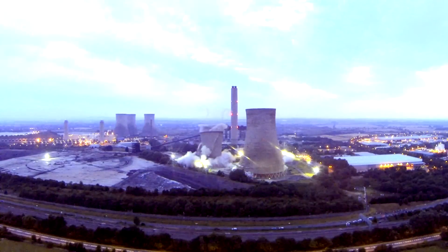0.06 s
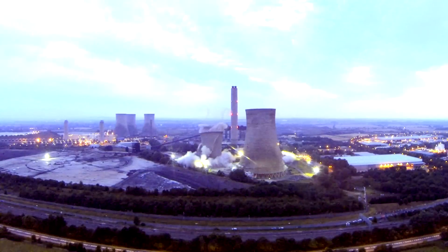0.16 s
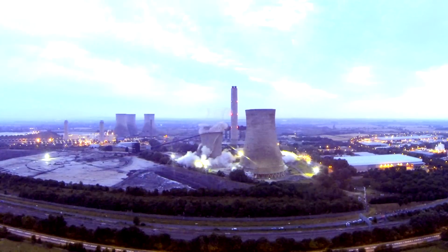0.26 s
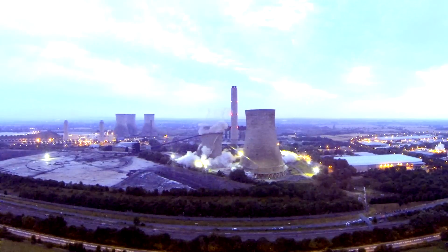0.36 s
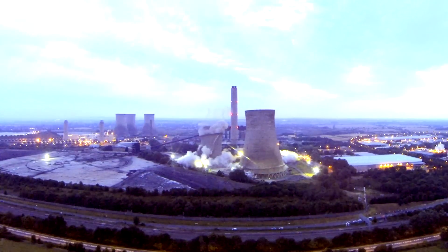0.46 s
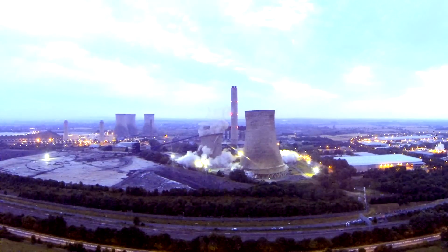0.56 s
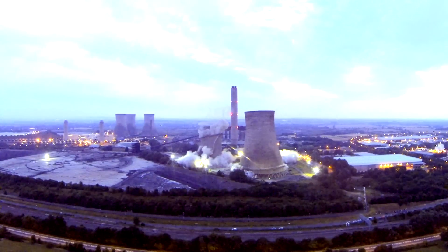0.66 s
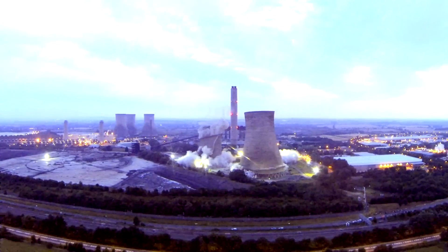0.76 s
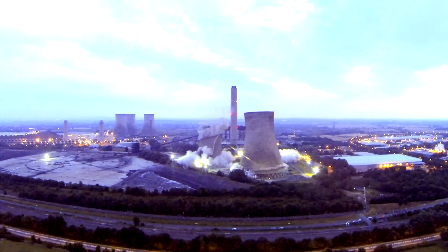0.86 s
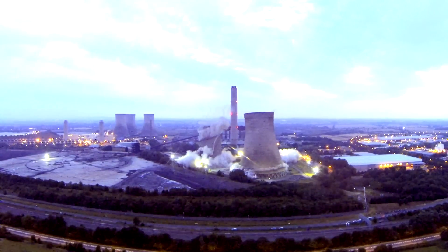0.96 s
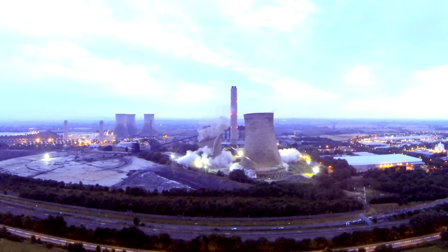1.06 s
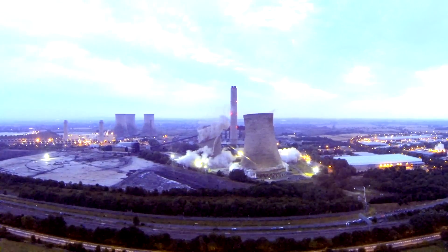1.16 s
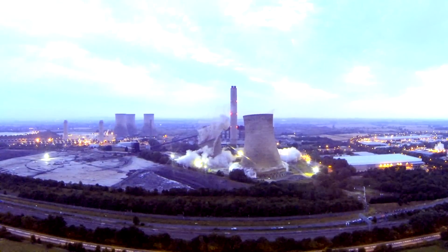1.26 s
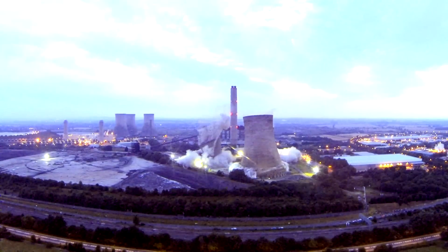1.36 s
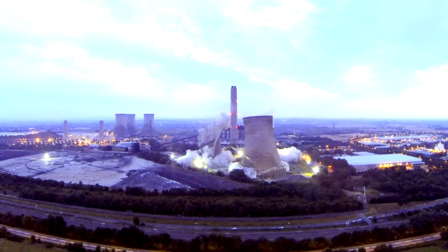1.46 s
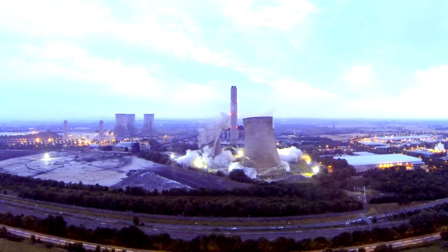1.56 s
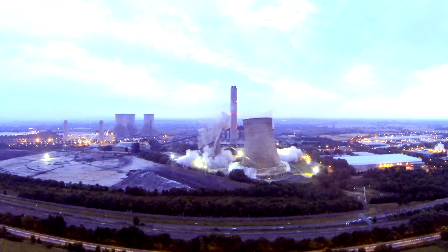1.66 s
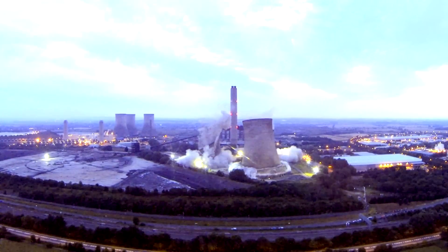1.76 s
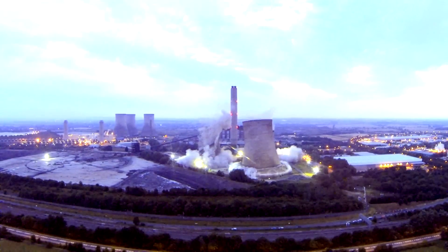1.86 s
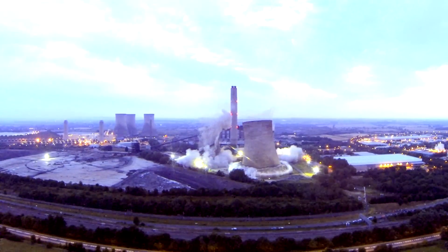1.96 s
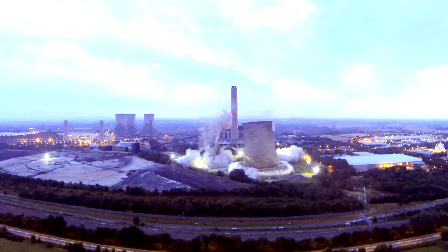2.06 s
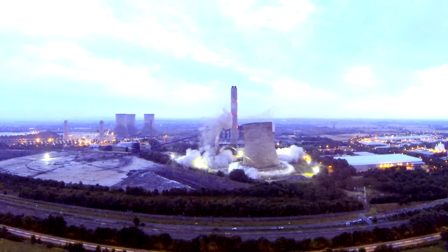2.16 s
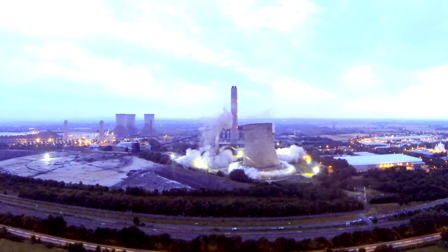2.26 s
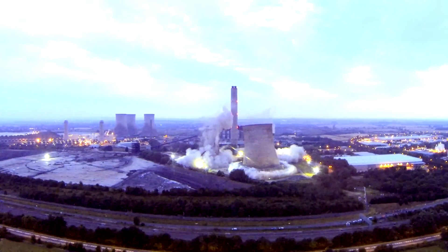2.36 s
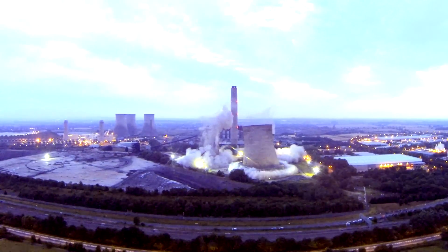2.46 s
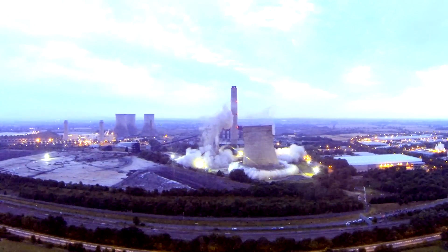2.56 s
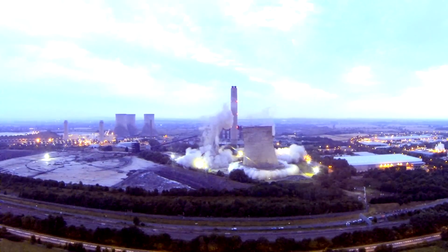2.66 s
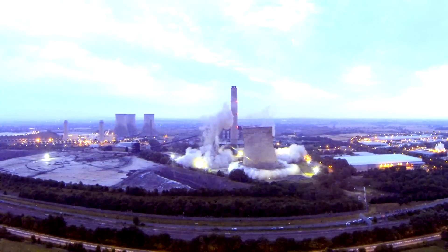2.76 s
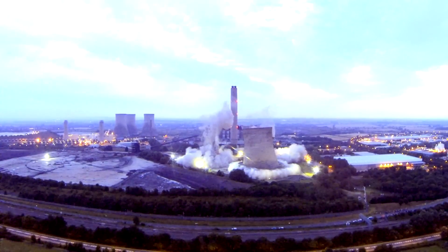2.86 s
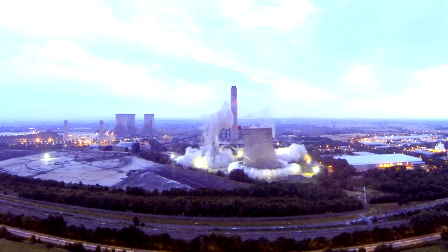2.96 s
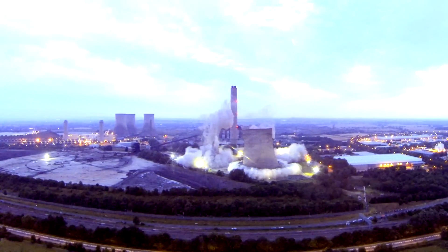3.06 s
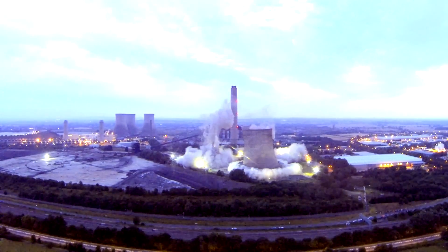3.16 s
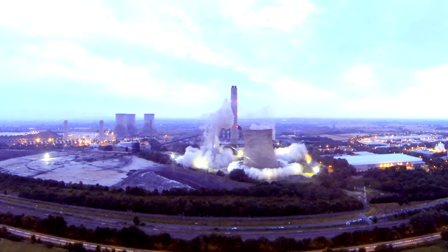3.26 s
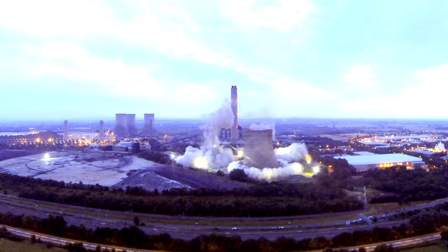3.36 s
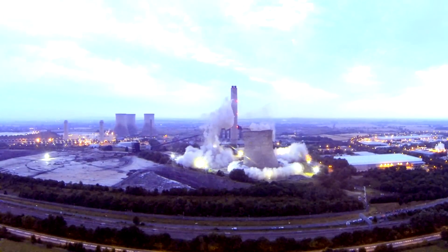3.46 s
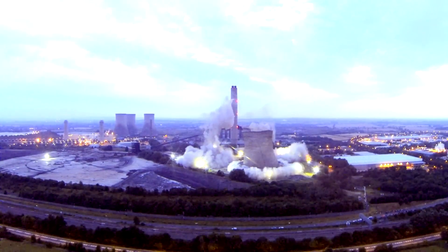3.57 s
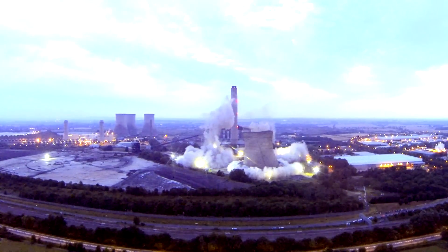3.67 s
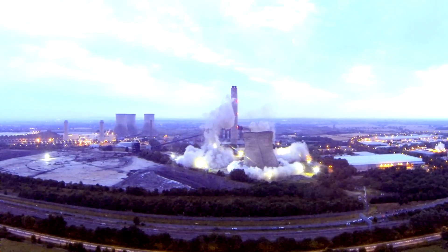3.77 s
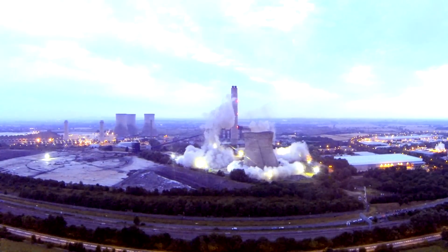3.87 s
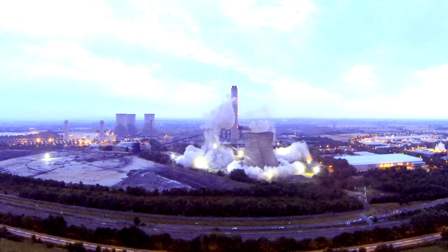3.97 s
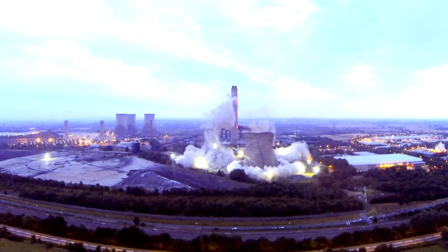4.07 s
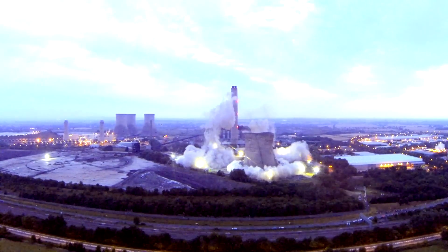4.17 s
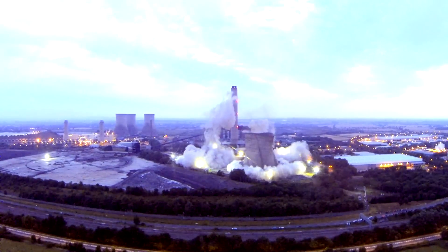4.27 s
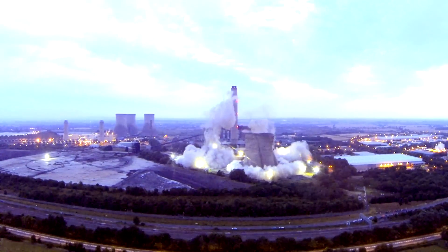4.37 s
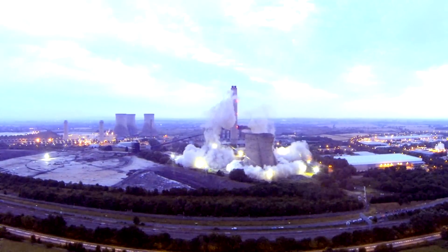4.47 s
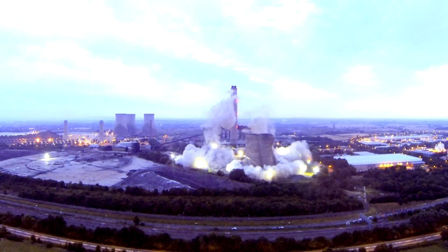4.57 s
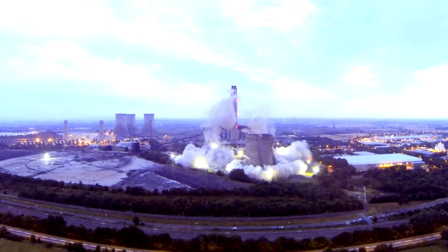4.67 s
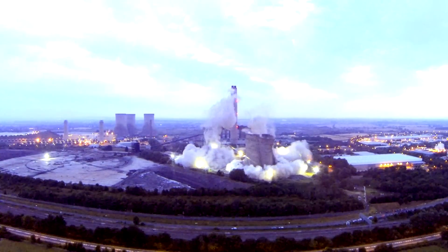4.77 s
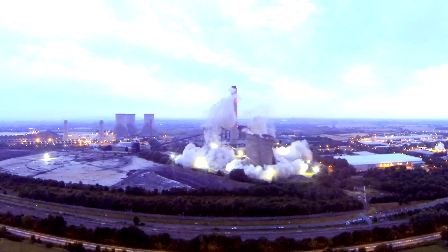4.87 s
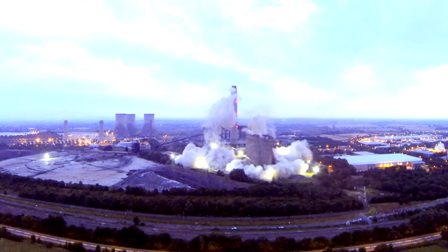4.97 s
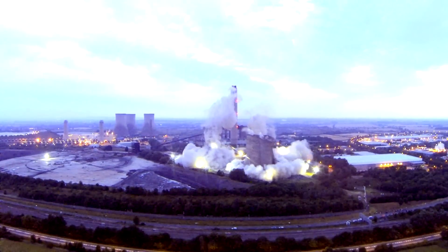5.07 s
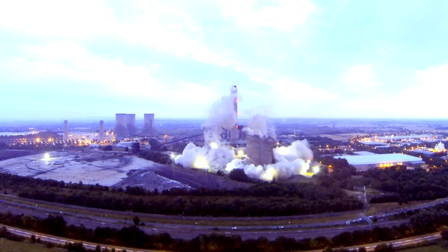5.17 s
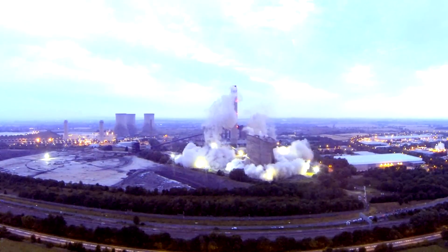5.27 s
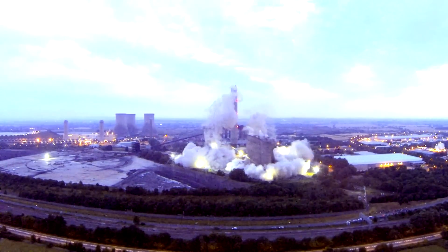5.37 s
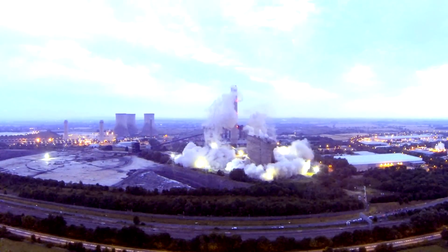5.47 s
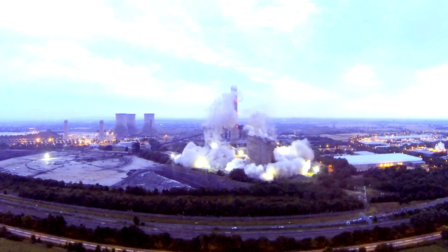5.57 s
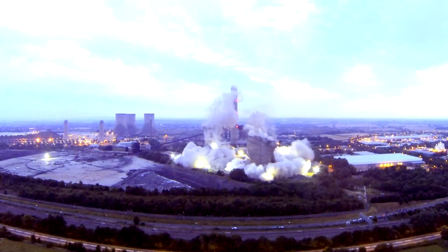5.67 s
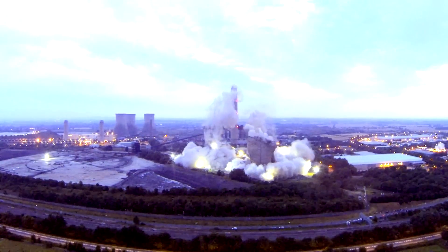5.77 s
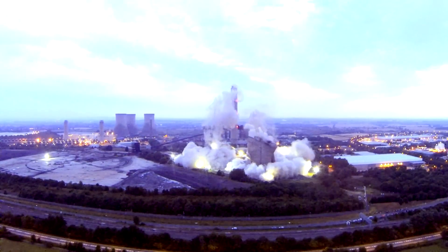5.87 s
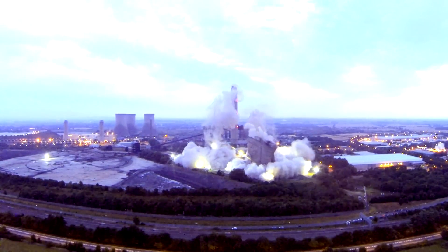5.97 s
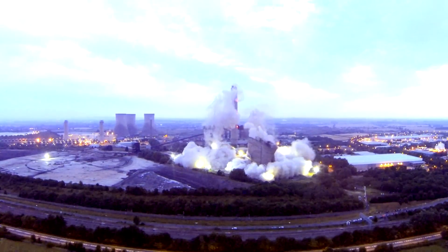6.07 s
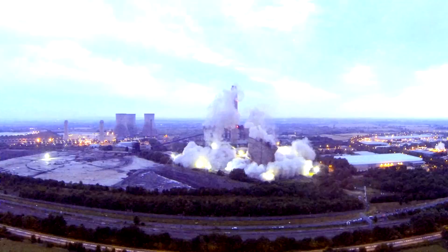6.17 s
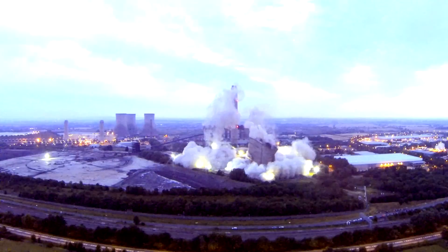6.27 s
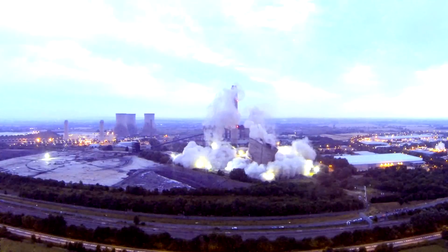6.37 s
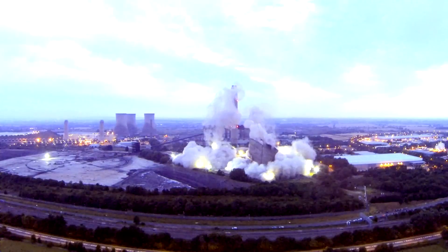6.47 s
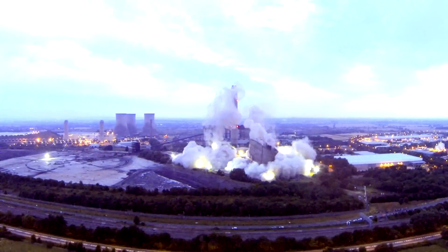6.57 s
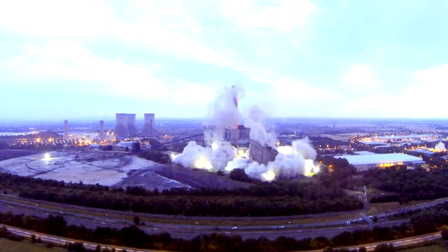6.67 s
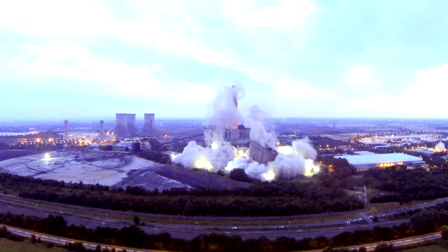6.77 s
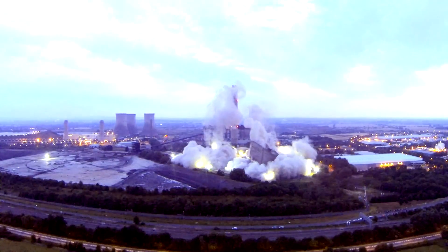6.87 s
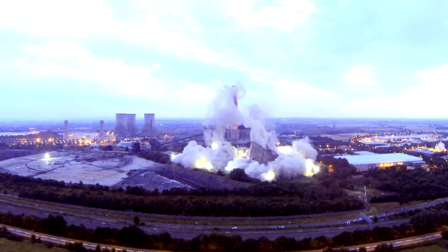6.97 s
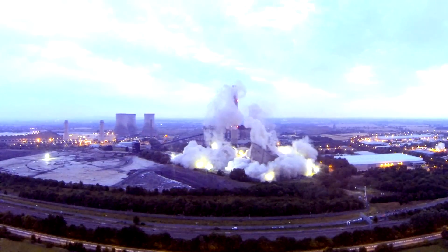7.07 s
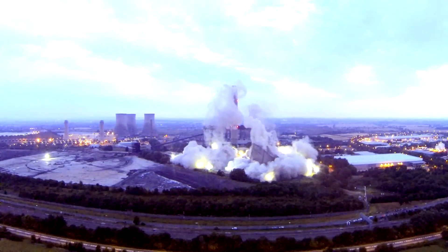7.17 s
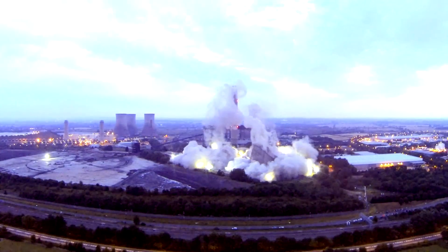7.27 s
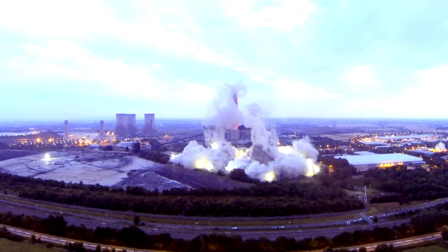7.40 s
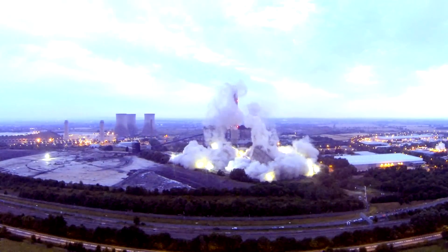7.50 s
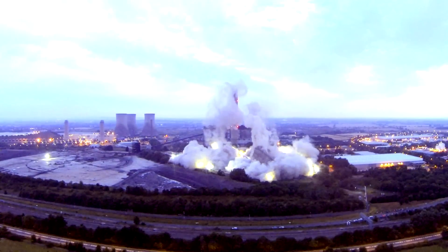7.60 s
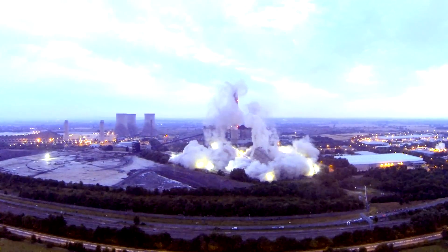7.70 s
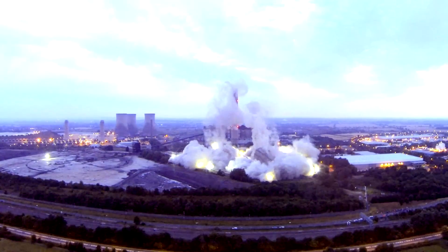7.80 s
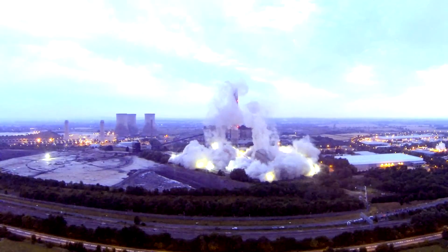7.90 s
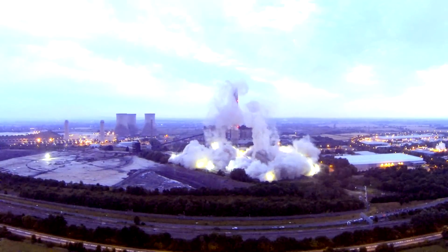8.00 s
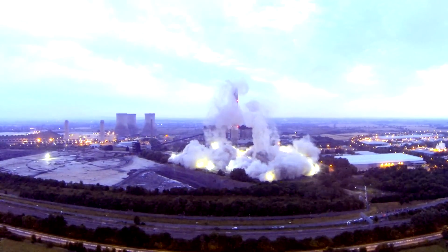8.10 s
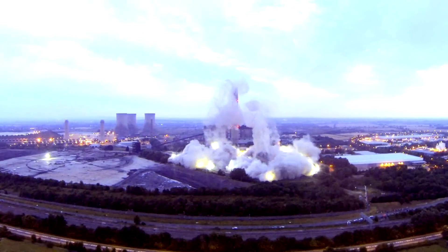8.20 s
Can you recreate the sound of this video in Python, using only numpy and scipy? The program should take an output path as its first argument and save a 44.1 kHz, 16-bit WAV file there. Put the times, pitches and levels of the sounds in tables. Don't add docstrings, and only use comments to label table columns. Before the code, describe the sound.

Heavy far-off explosions thud in overlapping echoes, concrete crashes down in a long fading rumble, with small ticks, faint hiss and a high whine.

```python
import sys
import numpy as np
from scipy import signal
from scipy.fft import rfft, irfft
from scipy.io import wavfile
from scipy.ndimage import uniform_filter1d

SR = 44100
rng = np.random.default_rng(int(sys.argv[2]) if len(sys.argv) > 2 else 0)


def wav_out(sig):
    wavfile.write(sys.argv[1], SR, np.round(np.clip(np.atleast_2d(sig).T, -1, 1) * 32767).astype(np.int16))


def field_ratio(decibels):
    return 10 ** (np.asarray(decibels, dtype=float) / 20)


N = 363384


def evened(x):
    return x / np.sqrt(np.mean(x ** 2) + 1e-20)


def add(mix, s, sound):
    part = mix[max(round(s * SR), 0):][:len(sound)]
    part += sound[:len(part)]


def curve(rows, column):
    rows = np.array(rows)
    return np.interp(np.arange(N) / SR, rows[:, 0], rows[:, column])


def coloured(x, points):
    f, db = np.transpose(points)
    hz = np.fft.rfftfreq(N, 1 / SR)
    gain = field_ratio(np.interp(np.log(hz + 1), np.log(f + 1), db))
    return evened(irfft(rfft(x) * gain, N))


def steadied(x, share, span_s):
    span = round(span_s * SR)
    power = uniform_filter1d(uniform_filter1d(x ** 2, span), span)
    return evened(x / (abs(power) + 1e-4) ** (share / 2))


def ring(hz, t60, rise_s=0.00095):
    t = np.arange(SR // 10) / SR
    return np.sin(2 * np.pi * hz * t) * field_ratio(-60 * t / t60) * (1 - np.exp(-t / rise_s))


def burst(lo_hz, hi_hz, t60):
    t = np.arange(SR // 10) / SR
    band = signal.butter(2, (lo_hz, hi_hz), "bandpass", fs=SR, output="sos")
    noise = evened(signal.sosfilt(band, rng.standard_normal(len(t))))
    return noise * field_ratio(-60 * t / t60) * (1 - np.exp(-t / 0.00078))


def hush(times, before_s, after_s, depth):
    out = np.zeros(N)
    for s in times:
        add(out, s - before_s, np.hanning(round((before_s + after_s) * SR)))
    return 1 - np.clip(depth, 0, 1) * np.minimum(out, 1)


def opening_ring():
    t = np.arange(SR // 10) / SR
    hz, level_db, t60 = 1270, -30, .03
    out = np.zeros(N)
    add(out, 0, field_ratio(level_db - 60 * t / t60) * np.cos(2 * np.pi * hz * t))
    return out


def dying(start_db, db_per_s, rest_db):
    return np.hypot(field_ratio(start_db + db_per_s * np.arange(N) / SR), field_ratio(rest_db))


# (time [s], roll level [dB], boom level [dB], thud level [dB])
ECHOES = [(0.0, 10.5, 8.5, -1.5), (.045, -8, -8, 11), (.075, 2, -16, -2), (.18, -13, 6, -1.5),
          (.34, 3, 8, 13.5), (.41, 1, 7, -2), (.55, 4, 4, -2), (.71, 7, -6, 9), (.78, 4, 0, 2),
          (.86, -5, 6, -2.5), (.94, 7, -2, -2.5), (1.01, -12, 8, -1), (1.17, 6.5, 3, -1), (1.22, -4, 1, 0),
          (1.265, 9, 1, 4.5), (1.33, -8, -8, 1.5), (1.42, -15, 2, 1), (1.54, -3, 11, -6), (1.7, 6, 10, 7),
          (1.81, 12, 18, 13.5), (1.97, 3, 4, 1.5), (2.04, -12, 10, -1.5), (2.66, -3, 4.5, 7.5),
          (2.87, 4, 4, -1.5), (2.95, 4, 2, 5.5), (3.21, 4.5, 1, -1), (3.99, 5, -1, 5), (5.33, -13, -5, -1),
          (6.82, 3, 4, .3), (7.1, 6, 10.5, -3)]


def echoes(column):
    t = np.arange(0, N + 64, 64) / SR
    db = np.zeros(len(t))
    for row in ECHOES:
        half_s = 0.018 + 0.007 * row[0]
        db += row[column] * np.exp(-((t - row[0]) / half_s) ** 2)
    return field_ratio(np.interp(np.arange(N) / SR, t, db))


# (frequency [Hz], level [dB per Hz])
ROLL = [(3, -30), (8, -10), (14, -4), (20, -1), (28, 0), (38, -4), (50, -14), (80, -40), (300, -120)]
BOOM = [(10, -92), (30, -40), (42, 4), (52, -4), (70, 0.5), (90, -5.5), (110, -14), (150, -47), (500, -120)]
THUD = [(20, -100), (70, -31), (105, 2), (130, 1), (170, -0.5), (220, -6), (300, -13), (420, -23),
        (600, -27.5), (900, -49), (2500, -110)]
# (time [s], debris roar level [dB])
FORCE = [(0, -35.5), (.04, -30), (.07, -35), (.14, -35.5), (.5, -39.5), (.87, -42), (1.42, -44),
         (1.56, -41.5), (1.65, -43), (1.93, -47.5), (2.03, -39.5), (2.14, -42), (2.3, -43), (2.6, -49.5),
         (3.3, -51), (3.55, -51), (6.1, -54.5), (8.24, -57.5)]


def rumble():
    a, b, c = rng.standard_normal((3, N))
    roll = steadied(coloured(a, ROLL), share=0.45, span_s=0.034)
    roll *= dying(start_db=-25, db_per_s=-5, rest_db=-58.5)
    boom = steadied(coloured(b, BOOM), share=1.0, span_s=0.054)
    boom *= dying(start_db=-33, db_per_s=-4, rest_db=-58)
    thud_db = curve(FORCE, column=1) + 1.4 - 10 * (np.arange(N) / N) ** 1.25
    thud = steadied(coloured(c, THUD), share=0.35, span_s=0.037) * field_ratio(thud_db)
    return roll * echoes(column=1) + boom * echoes(column=2) + thud * echoes(column=3)


# (frequency [Hz], width [Hz], level [dB])
HOUSING = [(413, 260, -14.5), (624, 40, -15.5), (982, 200, -10.5), (1170, 310, -9), (1270, 64, -1.5),
           (1330, 197, -3.5), (1674, 540, -14.5), (1910, 204, -14.5), (2563, 416, -21.5), (3034, 184, -22),
           (3384, 160, -27.5), (4050, 360, -51), (5650, 530, -76)]


def housing(x):
    hz = abs(np.fft.fftfreq(8192, 1 / SR))
    power = sum(field_ratio(2 * db) / (1 + (2 * (hz - f) / w) ** 2) ** 1.508 for f, w, db in HOUSING)
    power = power / (1 + (hz / 6500) ** 5.3)
    log_gain = np.log(power + 1e-11) / 2
    phase = -signal.hilbert(log_gain).imag
    taps = np.fft.ifft(np.exp(log_gain + 1j * phase)).real[:4096]
    return evened(signal.oaconvolve(x, taps)[:N])


LOUD_DB = -44
# (time [s], half length [s], tilt above the housing peak [dB per octave], body level [dB])
SHOWERS = [(1.983, 0.077, 2.5, -2), (3.65, .3, 3, 1.5), (4.38, .1, 2, 5.5), (5.0, 0.083, 1.3, 1.5),
           (5.5, .15, 2, .3), (6.2, 0.68, 3, 1.3), (7.952, 0.17, 0.8, 2)]


def roar():
    sizes = field_ratio(2.48 * np.minimum(rng.exponential(1, N), 6))
    struck = rng.random(N) < 2500 / SR
    impacts = sizes * struck * rng.choice([-1, 1], N)
    rung = housing(rng.standard_normal(N) + 0.52 * evened(impacts))
    hz, t, z = signal.stft(steadied(rung, share=0.72, span_s=0.1), SR, nperseg=512)
    tilt_db = -1.6 + 0.3235 * np.maximum(LOUD_DB - np.interp(t, *np.transpose(FORCE)), 0)
    body_db = -1.1 + 4.5 * np.exp(-((t - 2.25) / .7) ** 2)
    for s, half_s, shower_tilt_db, shower_body_db in SHOWERS:
        swell = np.exp(-((t - s) / half_s) ** 2)
        tilt_db += shower_tilt_db * swell
        body_db += shower_body_db * swell
    octaves = np.log2(np.maximum(hz, 1300) / 1300)[:, None]
    below = np.clip((1000 - hz) / 250, 0, 1)[:, None]
    z = z * field_ratio(np.minimum(octaves, 2.2) * tilt_db + below * body_db)
    return signal.istft(z, SR, nperseg=512)[1][:N] * field_ratio(curve(FORCE, column=1) + 0.5)


# (frequency [Hz], level [dB per Hz])
BUZZ_COLOUR = [(3500, -53), (4600, -26), (4850, 0), (5050, 2), (5350, -16), (6500, -48)]


def buzz():
    shaken = field_ratio(-76) * np.clip((.37 - np.arange(N) / SR) / .04, 0, 1)
    follows = field_ratio(-93.5 + .6 * (curve(FORCE, column=1) - LOUD_DB))
    level = np.sqrt(shaken ** 2 + follows ** 2 + field_ratio(2 * -84))
    return coloured(rng.standard_normal(N), BUZZ_COLOUR) * level


# (frequency [Hz], level [dB per Hz])
HISS = [(100, 6), (1000, 5), (4000, 4), (6000, 2), (8000, -1), (9750, -1.5), (10150, 2), (10700, -1),
        (13000, -2), (14200, -3), (15200, -5), (15600, -60)]
# (frequency [Hz], rms level [dB])
WHINE = [(6772, -100), (9830, -99), (10072, -102), (12075, -96), (13065, -100)]
# (multiple of the frame clock [1], rms level [dB])
SIDEBANDS = [(-10, -99), (-7, -101), (-6, -100), (-5, -103), (-3, -101), (-2, -96), (-1, -92), (0, -85),
             (1, -98), (2, -100), (3, -103)]


def circuit():
    t = np.arange(N) / SR
    whine_hz, clock_hz = 13906.1, 59.94
    tones = np.zeros(N)
    for hz, db in WHINE:
        tones += np.sqrt(2) * field_ratio(db) * np.sin(2 * np.pi * (hz * t + rng.random()))
    throb = np.zeros(N, complex)
    for k, db in SIDEBANDS:
        sign = 1 if k == 0 else -1
        throb += sign * field_ratio(db) * np.exp(2j * np.pi * k * clock_hz * (t - .0028))
    whine = np.sqrt(2) * (throb * np.exp(2j * np.pi * whine_hz * t)).real
    hiss = field_ratio(-72) * coloured(rng.standard_normal(N), HISS)
    return hiss + tones + whine


# (time [s], peak level [dB], pitch [Hz])
TICKS = [(0.0254, -58, 4140), (0.051, -55, 4110), (0.2238, -54, 4050), (0.2578, -50, 4200),
         (0.5094, -52, 4230), (0.8939, -57, 4930), (1.5893, -55, 4920), (1.7943, -56, 4930),
         (2.0018, -61, 5200), (2.2428, -67, 4690), (3.6014, -56, 4940), (4.6149, -54, 4800),
         (5.0379, -60, 4800), (5.3128, -77, 4820), (6.5735, -55, 4900), (6.7777, -55, 4750),
         (6.985, -57, 5640), (7.2708, -55, 4920)]
HIGH_TICKS = [(0.175, -58, 7410), (0.5127, -60.5, 6980), (0.8225, -61, 6800), (0.8505, -57, 7500),
              (1.1877, -56, 7100), (1.5259, -61, 7400), (1.8357, -63, 7310), (1.8637, -58, 7280),
              (2.173, -64, 7110), (2.193, -57, 7250), (4.9876, -56, 7210)]


def mount_ticks():
    out = np.zeros(N)
    for s, db, hz in TICKS:
        tick = .7 * ring(hz, 0.018) + .65 * burst(0.83 * hz, 1.75 * hz, 0.015)
        add(out, s, field_ratio(db - 1) * tick)
    for s, db, hz in HIGH_TICKS:
        tick = ring(hz, .02) + 0.68 * burst(.95 * hz, 1.5 * hz, 0.016)
        add(out, s, field_ratio(db - 5) * tick)
    return out


# (time [s], peak level [dB], cycle [s], signed strength: + push first, - suction first [1])
WAVES = [(0.026, -14, 0.032, -1.08), (0.091, -14.5, 0.02, -0.71), (.326, -19.5, 0.039, -1.14),
         (.451, -17, 0.0374, -0.95), (0.696, -18.5, 0.0385, -0.89), (1.265, -20.5, 0.034, 0.85),
         (1.514, -26, 0.022, -1.37), (1.69, -28.5, 0.026, -1.4), (1.789, -21.5, 0.0286, 1.03),
         (3.975, -29.5, 0.032, -0.65), (5.065, -38.5, .027, -1.3), (5.18, -35, 0.023, 0.8),
         (8.104, -44, 0.0167, -1.3), (8.168, -40, 0.015, 0.92), (8.209, -40.1, .019, -0.83)]


def pressure_waves():
    out = np.zeros(N)
    for s, db, cycle_s, sign in WAVES:
        u = np.arange(0, 1.3, 1 / (cycle_s * SR))
        wave = np.sin(2 * np.pi * u ** 0.81) * signal.windows.tukey(len(u), .45)
        add(out, s, sign * field_ratio(db) * wave)
    return out


# (time [s], peak level [dB], housing pitch [Hz])
CRACKS = [(0.081, -24, 1270), (0.184, -27.5, 1360), (0.285, -26.5, 1335), (0.365, -32, 1300),
          (1.492, -31, 1270), (1.565, -22.5, 1320), (1.579, -30, 1295), (1.841, -37, 1266),
          (2.137, -36, 1290), (2.176, -31, 1326), (2.237, -29, 1270), (2.264, -29, 1280),
          (2.336, -34, 1215), (3.524, -38.5, 1280), (3.857, -47, 1210), (4.097, -34, 1300),
          (4.186, -34, 1264), (4.986, -39, 1320), (5.121, -40, 1310)]


def cracks():
    out = np.zeros(N)
    for s, db, hz in CRACKS:
        modes = ring(hz, .06, 0.00041) + 0.22 * ring(hz * 1.45, .04) + 0.3 * ring(hz * .76, 0.047)
        add(out, s, field_ratio(db - 5) * (modes + 0.2 * burst(800, 1750, 0.045)))
    return out


# (time [s], peak level [dB], length [s], first frequency [Hz], half the rise rate [Hz/s])
CHIRPS = [
    (0.61, -65.5, 0.064, 4000, 800),
    (.66, -72, 0.09, 4080, 900),
    (5.43, -70, 0.028, 4700, -1500),
]


def bird():
    out = np.zeros(N)
    for s, db, length_s, hz, rise in CHIRPS:
        t = np.arange(0, length_s, 1 / SR)
        wobble = 1.1 * evened(uniform_filter1d(rng.standard_normal(SR // 10), 120))[:len(t)]
        note = np.sin(2 * np.pi * (hz + rise * t) * t + wobble)
        add(out, s, field_ratio(db) * note * signal.windows.tukey(len(t), .7))
    return out


# (start [s], length [s], first frequency [Hz], last frequency [Hz], level [dB])
MOAN = [(5.237, 0.13, 82, 78.7, -54.5), (5.4, 0.11, 73, 71.5, -50), (5.506, .17, 69, 57, -47.5),
        (5.701, .13, 60, 74, -53), (5.84, .1, 78.2, 81, -53), (5.97, 0.45, 73, 74.7, -49),
        (6.839, 0.26, 61, 56.3, -46), (6.995, 0.28, 68.3, 73.5, -43), (7.218, 0.33, 59.8, 57.2, -42.5),
        (7.447, .26, 74.1, 78.4, -46.5), (8.0, 0.14, 62.9, 73.3, -49.5), (8.114, 0.08, 77, 75, -48)]


def moan():
    level, t, marks = np.zeros(N), np.arange(N) / SR, []
    for s, length_s, first_hz, last_hz, db in MOAN:
        add(level, s, field_ratio(db + 1.0) * signal.windows.tukey(round(length_s * SR), .9))
        marks += [(s + .25 * length_s, first_hz), (s + .75 * length_s, last_hz)]
    waver = 1 + 0.068 * evened(uniform_filter1d(rng.standard_normal(N), 1500))
    hz = np.interp(t, *np.transpose(marks)) * waver
    return level * np.sin(2 * np.pi * np.cumsum(hz) / SR)


# (time [s], peak level [dB], length [s], share of bright modes [0-1])
SNAPS = [
    (8.0005, -44, .009, .45),
    (8.014, -52, .0035, .9),
]
# (frequency [Hz], level [dB])
SNAP_MODES = [(1750, -5), (2150, -2), (2550, 2), (3100, -11), (3700, -15), (4600, -15), (5600, -11),
              (6600, -18), (8100, -17), (10200, -13)]


def snaps():
    out = np.zeros(N)
    for s, db, length_s, bright in SNAPS:
        t = np.arange(0, length_s, 1 / SR)
        modes = np.zeros(len(t))
        for hz, level_db in SNAP_MODES:
            share = bright if hz > 4000 else 1 - bright
            modes += field_ratio(level_db) * share * np.sin(2 * np.pi * (hz * t + rng.random()))
        scrape = (1 - bright) * burst(1580, 2700, 0.085) + 0.42 * bright * burst(3300, 9500, 0.042)
        snap = 0.33 * modes + 0.89 * scrape[:len(t)]
        add(out, s, field_ratio(db + 2.5) * snap * signal.windows.tukey(len(t), .4))
    return out


def scene():
    onset = np.minimum(np.arange(N) / 60, 1)
    low = rumble() * hush([row[0] for row in WAVES], before_s=.025, after_s=.06, depth=.9)
    high = roar() * hush([row[0] for row in CRACKS], before_s=.012, after_s=.004, depth=.5)
    fronts = opening_ring() + pressure_waves() + cracks()
    small = mount_ticks() + bird() + snaps()
    return ((low + high) * onset + fronts + buzz() + moan() + small)[None]


# (low edge [Hz], level at which half the frames lose it [dB])
TOP_BANDS = [(14150, -33), (14450, -38), (14750, -43), (15000, -54)]


def starve(x):
    hz, t, z = signal.stft(x, SR, nperseg=2048, noverlap=1024)
    level_db = 10 * np.log10(uniform_filter1d((abs(z) ** 2).sum(0), size=9) + 1e-12)
    mood = 4 * rng.standard_normal(len(t))
    keep = np.ones(z.shape)
    for edge_hz, limit_db in TOP_BANDS:
        keep[hz > edge_hz] = level_db + mood + 5 * rng.standard_normal(len(t)) < limit_db
    return signal.istft(z * keep, SR, nperseg=2048, noverlap=1024)[1][:N]


def roll_off(x):
    return signal.sosfilt(signal.butter(12, 15224, fs=SR, output="sos"), x)


def record(dry):
    mix = starve(dry[0] + circuit())[None]
    return roll_off(mix)


dry = scene()
out = record(dry)
wav_out(out)
```